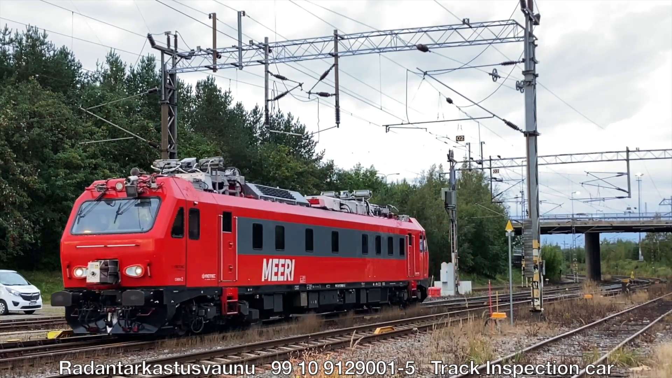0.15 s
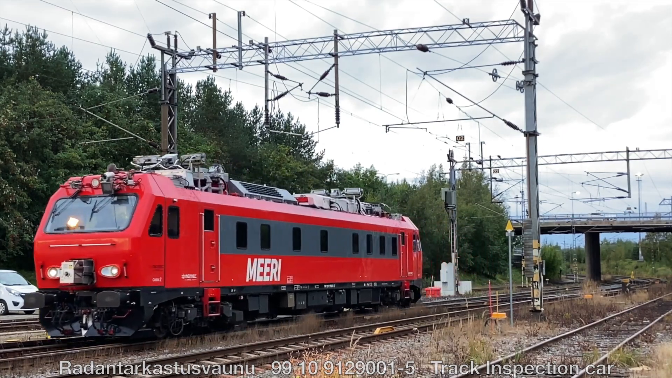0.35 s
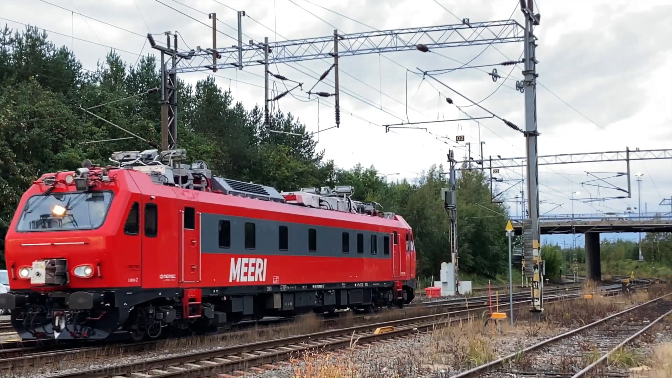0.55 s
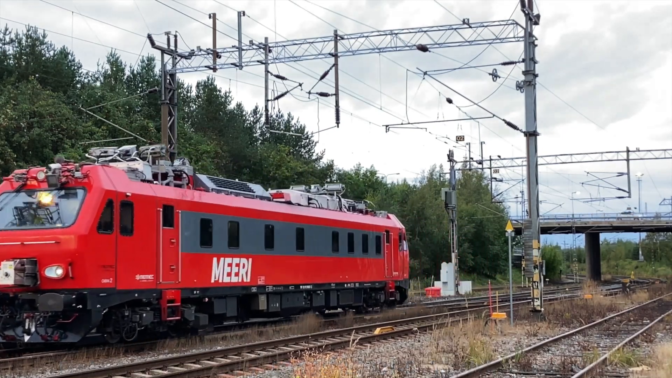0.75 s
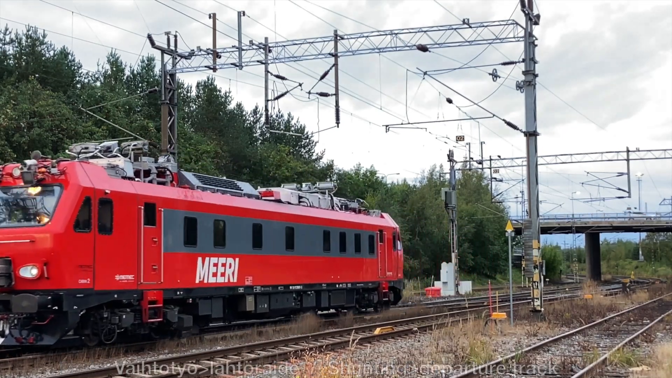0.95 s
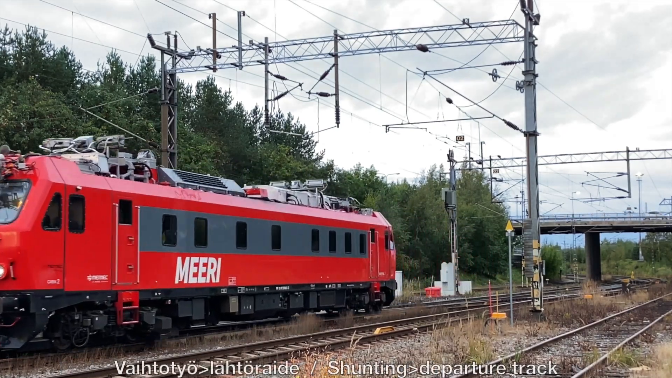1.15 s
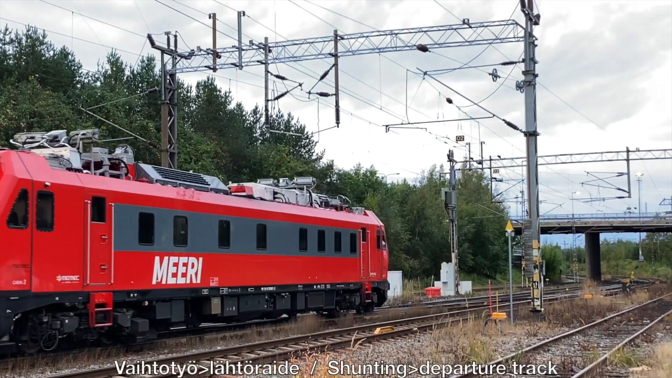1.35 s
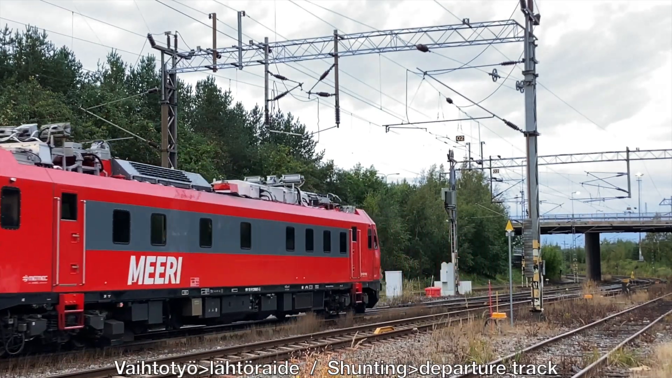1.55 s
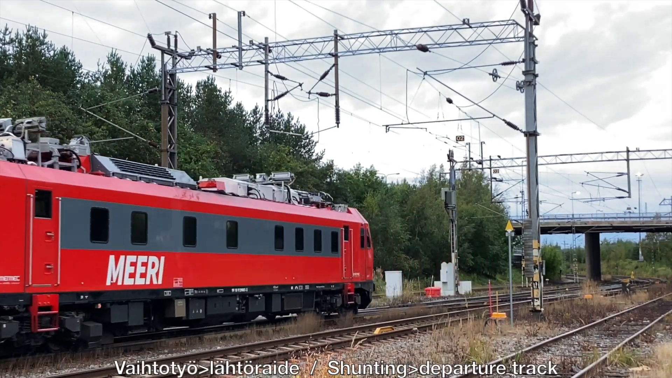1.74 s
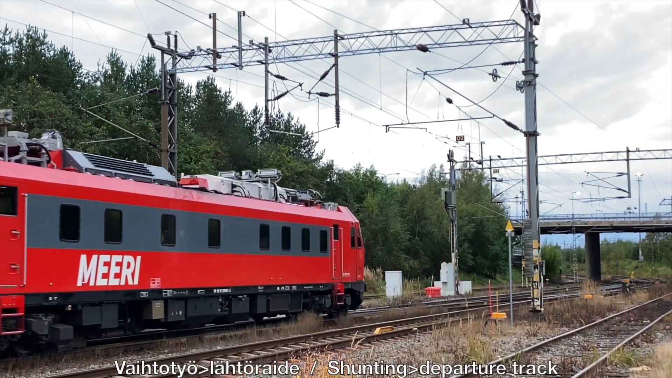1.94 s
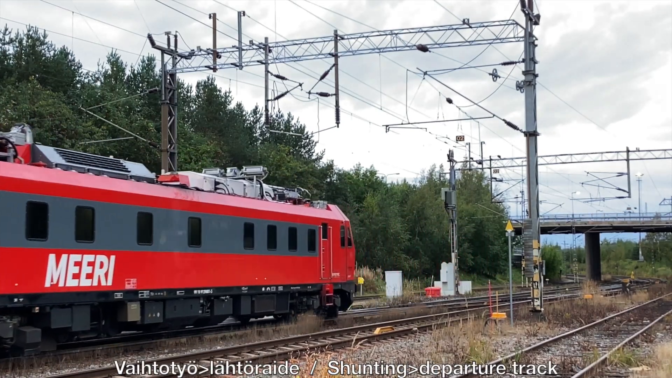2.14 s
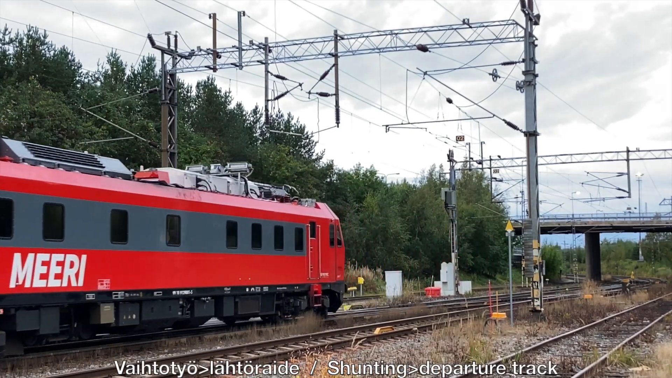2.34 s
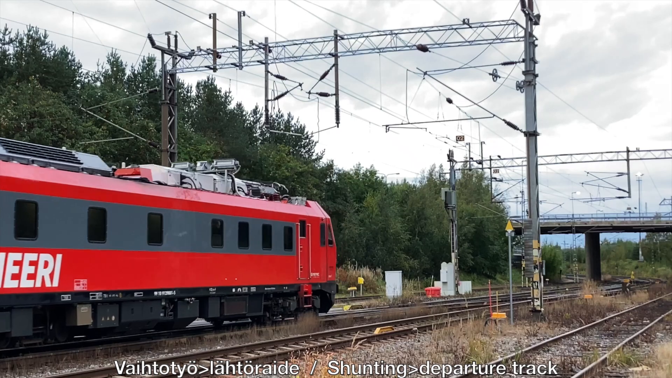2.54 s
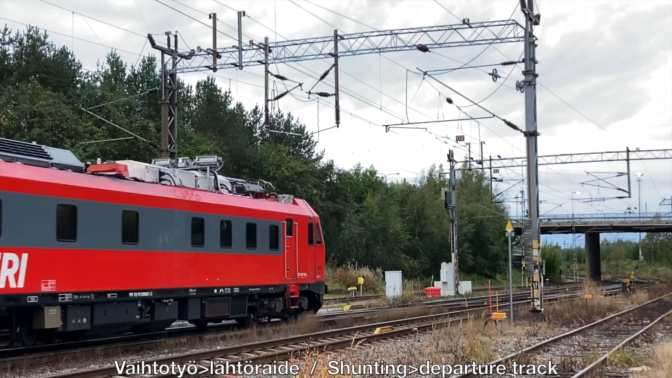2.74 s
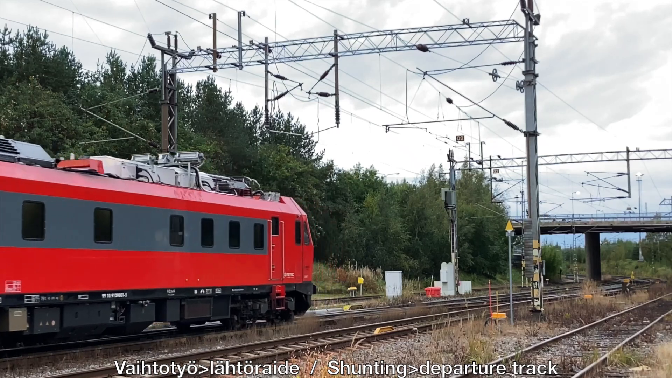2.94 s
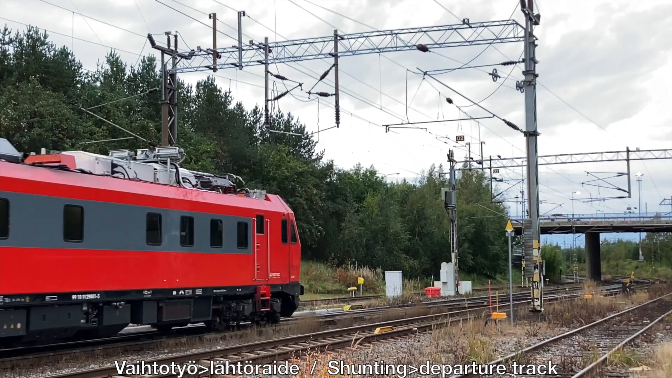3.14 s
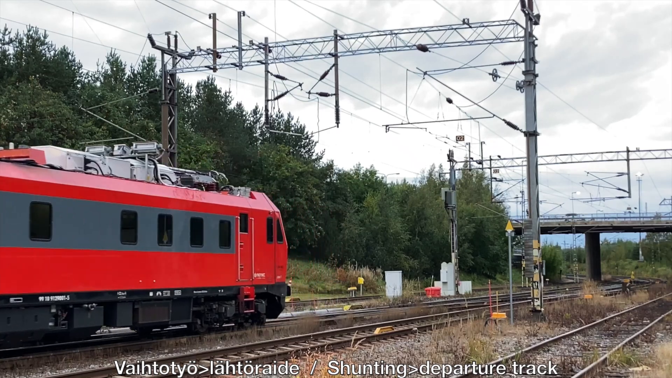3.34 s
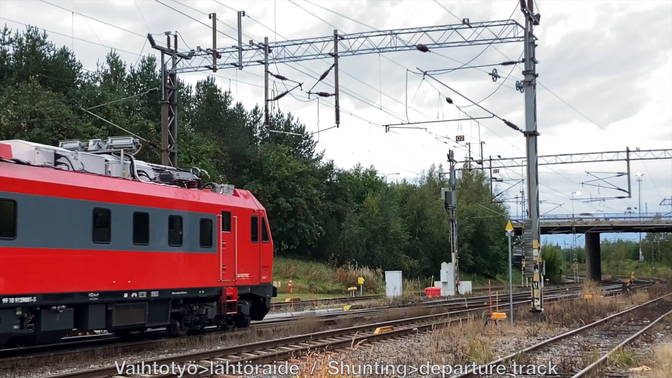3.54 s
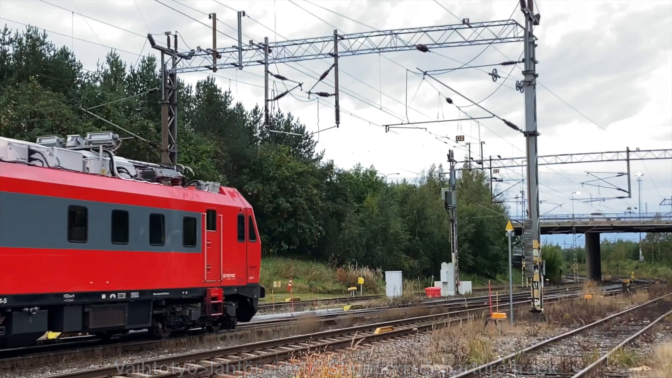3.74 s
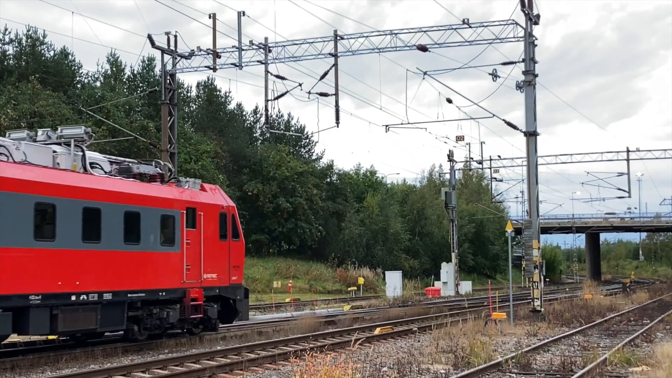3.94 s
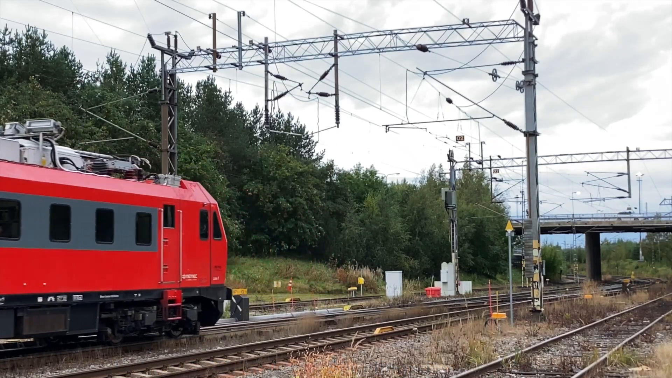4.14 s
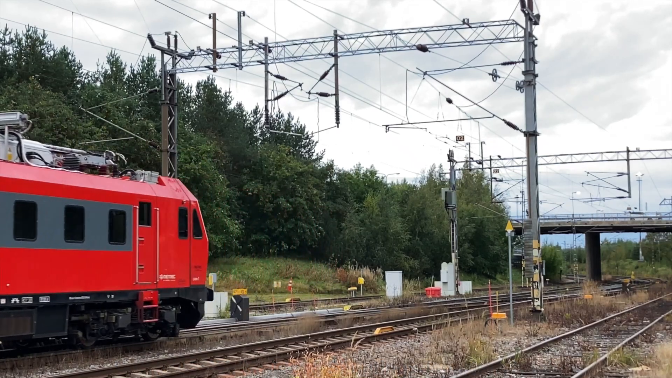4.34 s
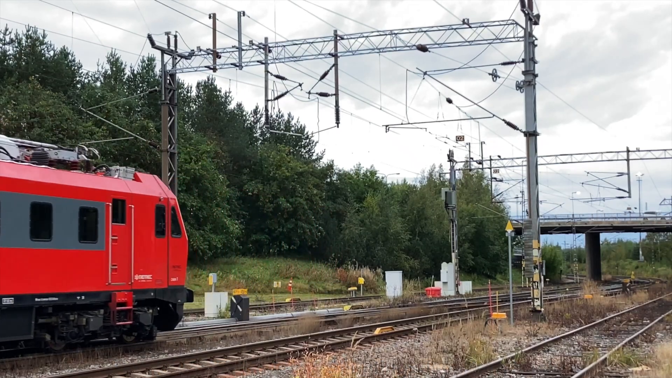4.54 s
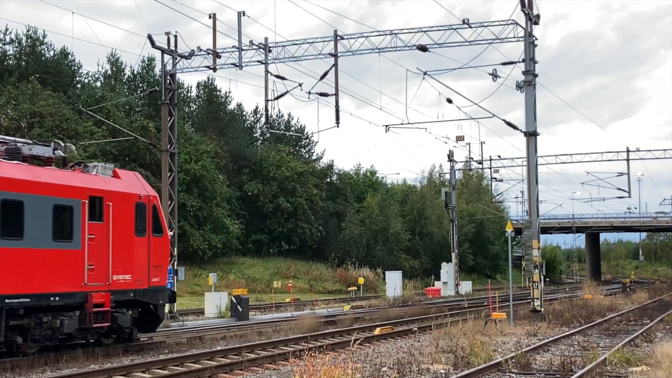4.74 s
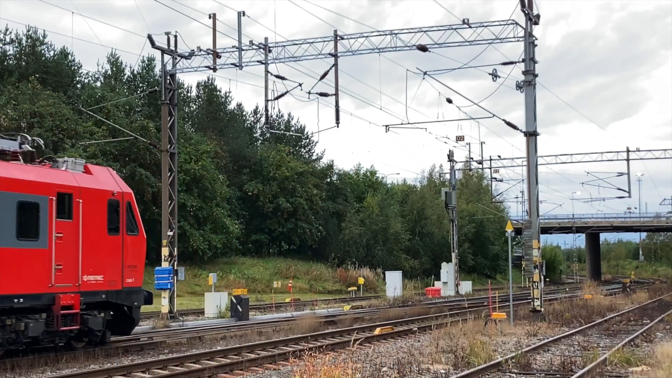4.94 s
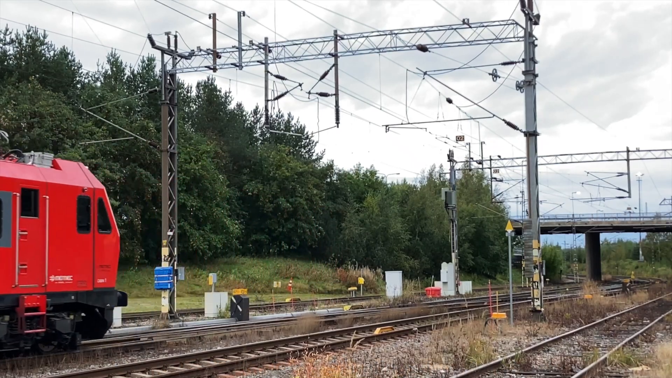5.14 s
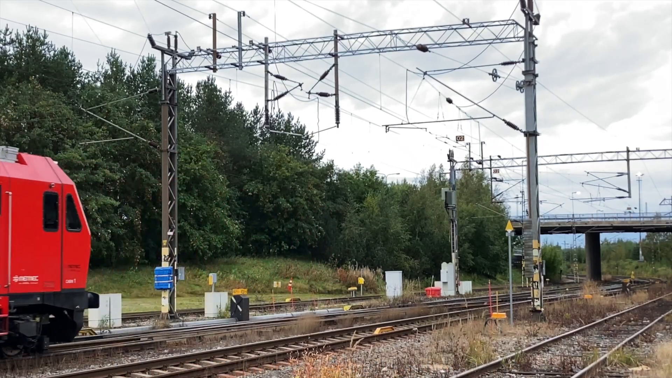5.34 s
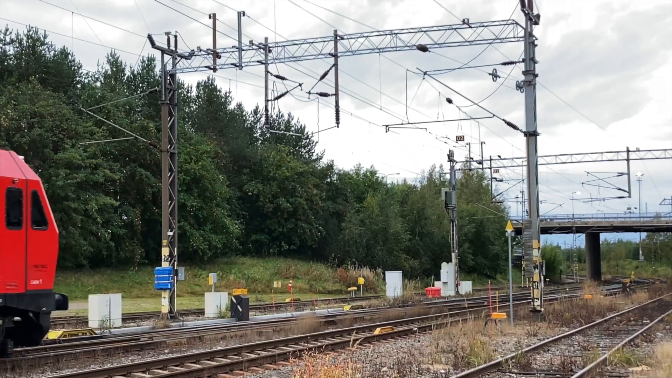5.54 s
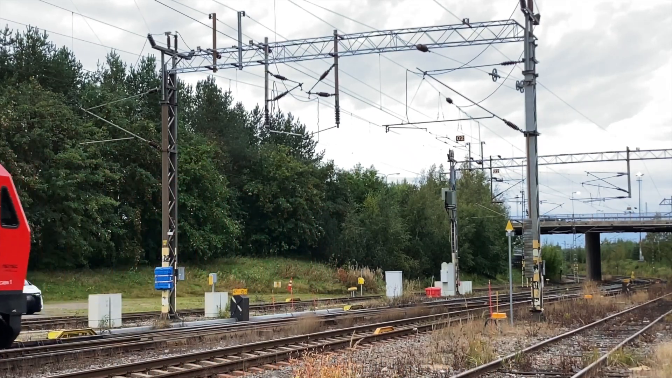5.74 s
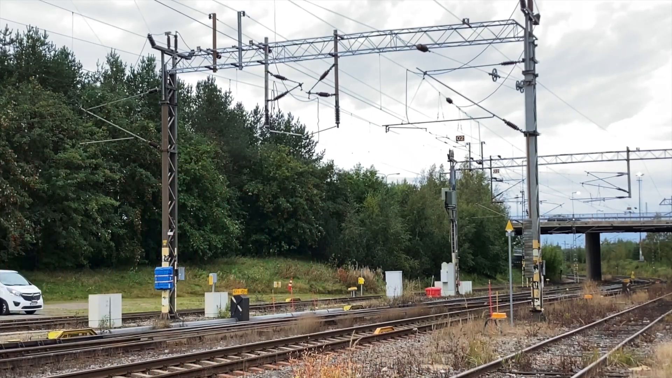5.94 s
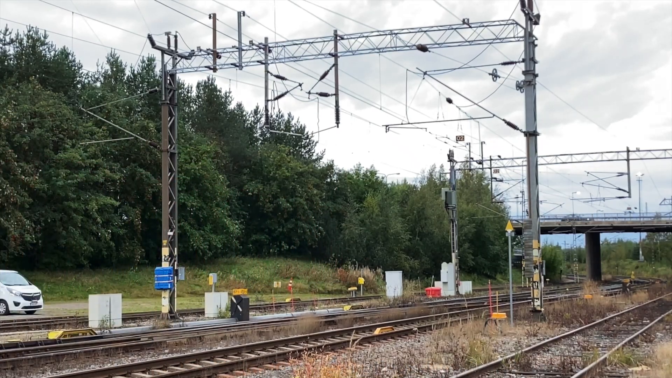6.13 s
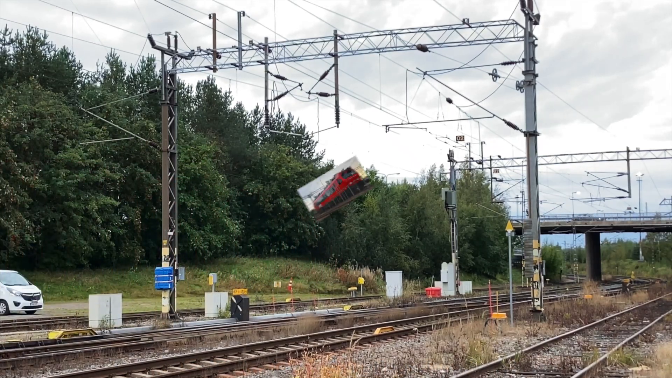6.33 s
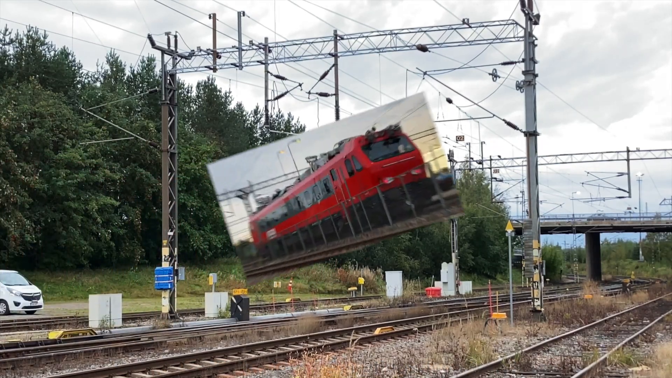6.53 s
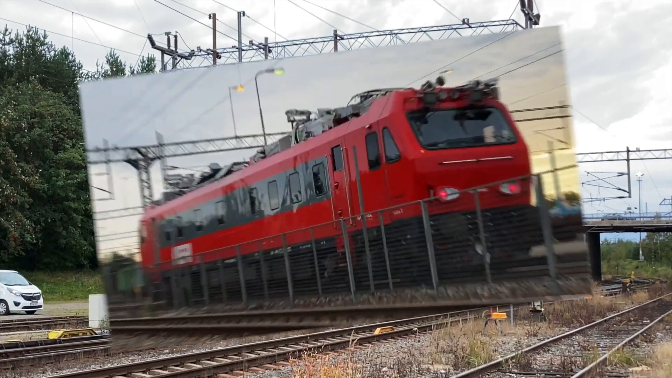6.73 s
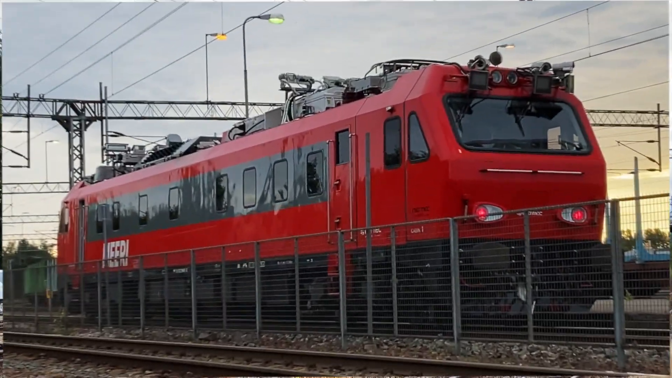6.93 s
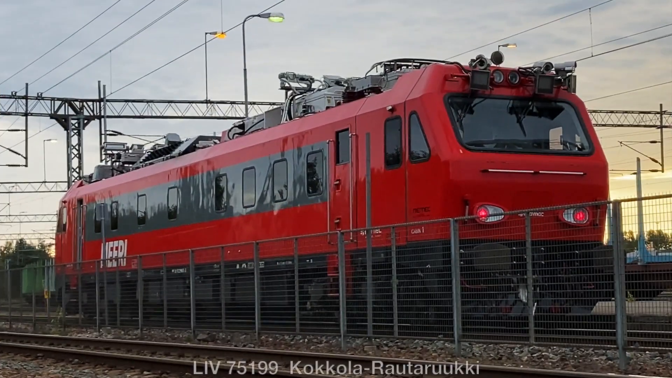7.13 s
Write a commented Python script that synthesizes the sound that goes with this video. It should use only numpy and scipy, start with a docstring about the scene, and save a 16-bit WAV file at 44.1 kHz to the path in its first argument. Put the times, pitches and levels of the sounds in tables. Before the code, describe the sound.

Outdoors in a rail yard, a stereo microphone beside the track catches an electric rail car creeping leftwards. A throbbing wheel squeal, thin whistle, faint converter whine and low rumble run throughout. Paired axle knocks clack and thump over rail joints early, then again midway. Dull sleeper thuds follow as the tail passes. After six seconds it fades while another car's steady roar rises, first on the left.

```python
"""An electric rail car rolls slowly leftwards through a yard past a two-port microphone. From the start a wheel
squeals (a throbbing tone), converters whine (steady lines), a thin whistle sounds and the track rumbles (shaped noise).
Axles knock in pairs over rail joints, with echoes and after-hits: noise bursts, ringing steel and a low thump.
From 3.4 s gear lines come forward, from 3.7 s sleepers thud (fading tones), and near 5.6 s a soft hiss swells.
After 6 s the car fades out while a second car, a steady roar with clean tones, is faded in from the left."""
import sys
import numpy as np
from scipy import signal
from scipy.fft import rfft, irfft
from scipy.io import wavfile
from scipy.ndimage import uniform_filter1d, map_coordinates

SR = 44100
rng = np.random.default_rng(int(sys.argv[2]) if len(sys.argv) > 2 else 0)


def to_wav(s):
    """Save 16-bit WAV."""
    ch = np.atleast_2d(s).T  # columns
    pcm = np.round(np.clip(ch, -1, 1) * 32767)  # PCM
    wavfile.write(sys.argv[1], SR, pcm.astype(np.int16))


N = 316638
T = np.arange(N) / SR  # time of each sample [s]
HZ = np.maximum(np.arange(N // 2 + 1) * SR / N, 1)  # frequency of each spectrum step

# second car: (time [s], level [dB])
SECOND_LEVEL = [(6.1, -62), (6.4, -46), (6.6, -39.5), (6.75, -38.5), (6.95, -36), (7.18, -35.5)]
# colour of its roar: (frequency [Hz], relative level [dB per Hz])
SECOND_COLOUR = [(25, -32), (55, 2), (130, -6), (220, -13.5), (560, -14.5), (900, -13), (1200, -13.5),
                 (1700, -21.5), (2100, -22), (2700, -36.5), (4300, -35.5), (5500, -46), (10600, -46),
                 (16000, -59)]
# its hum and converter lines: (frequency [Hz])
SECOND_LINE_HZ = [376.8, 543.7, 4101, 4263, 4301, 4360, 4402, 6352, 6452, 6652, 6752, 9550, 10654]
# strength of those lines over the car's level: (level [dB])
SECOND_LINE_DB = [-8.5, -13.5, -46, -45, -37, -41, -25, -24, -55, -49, -48, -33, -43]

# dull thuds of the sleepers behind the rear axles: (time [s], level [dB])
THUDS = [(3.719, -19), (3.855, -23.5), (3.909, -35), (3.975, -28.5), (4.194, -25), (4.27, -32),
         (4.331, -24.5), (4.381, -23), (4.457, -33), (4.533, -30.5), (4.587, -30), (4.917, -41),
         (4.958, -27.5), (5.038, -27), (5.13, -29), (5.242, -24), (5.29, -30), (5.506, -33), (5.562, -28.5),
         (5.726, -40), (5.836, -31.5)]
# tones of a struck sleeper: (frequency [Hz], level [dB], time to fall by 60 dB [s])
SLEEPER_MODES = [(146.5, -2.5, 0.079), (209, -1.5, .14), (241, -5.5, 0.083), (326, -9, 0.093)]

# rolling noise: (time [s], track rumble [dB], wheel roar [dB], hiss [dB])
ROLL_LEVEL = [(0, -35.5, -37.5, -44.5), (.55, -30, -38, -43), (.9, -31.5, -35, -38.5),
              (1.15, -34, -36.5, -43), (1.4, -30, -35.5, -37), (1.65, -32.5, -37, -44.5),
              (3.35, -34, -38, -43.5), (3.85, -28, -39, -43.5), (4.35, -30.5, -39, -45),
              (4.7, -35.5, -38, -45.5), (5.16, -30, -41.5, -47.5), (5.5, -39.5, -44, -49),
              (5.76, -33.5, -45, -50.5), (5.98, -41.5, -48, -53), (6.25, -45, -49.5, -56.5),
              (6.5, -49, -53, -58.5)]
# colour of the rolling noise: (frequency [Hz], relative level [dB per Hz])
ROLL_COLOUR = [(25, -25), (50, -2.5), (99, -2.5), (157, -15), (300, -13.5), (560, -17), (1230, -22.5),
               (1450, -15.5), (1700, -18), (2700, -24), (4030, -29.5), (6920, -42.5), (9070, -42.5),
               (11000, -45.5), (16000, -53.5)]
# wheel resonances in the rolling noise: (frequency [Hz], width [Hz], lift [dB])
WHEEL_ROLL = [(2020, 126, 5.5), (3357, 78, 7.5), (4370, 150, 8), (6800, 710, 8), (9620, 120, 18.5),
              (11150, 370, 6), (16600, 180, -3)]
AIR_S, AIR_LENGTH_S, AIR_DB = 5.62, .3, -73  # a soft treble hiss swells as the tail goes by

# motor hum: (time [s], level [dB], time by which the left port leads [ms])
HUM_LEVEL = [(0, -55, -0.069), (.55, -47.5, -0.2), (1.3, -63, 0.29), (2.3, -46.5, 0.23), (3, -46, 0.19),
             (3.35, -50, 0.17), (3.7, -42.5, -0.24), (4.5, -46.5, -0.038), (5.5, -45, -0.4),
             (6.25, -61.5, -0.36), (6.5, -66, -0.3)]
# tones of the motor hum: (frequency at the start [Hz], width [Hz], level [dB])
HUM_TONES = [(566, 30, -0.5), (444.7, 36, -7), (230, 38, -5), (672, 25, -10.5), (1123, 22, -12)]
THUD_DB = -9  # lumpy thudding that comes with the hum, over its level
# gear lines: (frequency at the start [Hz], width [Hz], level [dB])
GEARS = [(1320, 26, 6), (1780, 23, 1), (2020, 20, 0), (2210, 22, -2.5), (2364, 23, 0), (2425, 21, -4.5)]
# the gears come forward once the car has turned its tail: (time [s], level [dB])
GEAR_LEVEL = [(0, -91), (3.4, -67), (4.2, -61.5), (4.8, -58.5), (5.5, -61), (6, -68.5), (6.5, -72)]

COMB_HZ, WHINE_HZ = 101, 4253  # at the start: step between converter lines, lowest line of the lower comb
# upper comb of the converter: (lowest line at the start [Hz], lines [count], level over the hiss [dB])
UPPER_COMB = [(6332, 6, -29)]
FADE_DB, FADE_PER_S = 8, 2.2  # most that an upper line rises or falls, and how often it heads elsewhere
# lower comb, whose lines take turns: (time [s], line 1 [dB], line 2 [dB], line 3 [dB], line 4 [dB])
WHINE_LEVEL = [(0, -69, -65, -79, -70), (.55, -71, -75, -75, -68), (.8, -72, -66, -70, -61),
               (1.05, -72, -56, -65, -63), (1.24, -72, -53, -67, -64), (1.4, -74, -72, -71, -70),
               (1.58, -76, -74, -59, -70), (1.78, -72, -75, -59, -65), (1.9, -71, -74, -68, -70),
               (2.15, -62, -64, -73, -68), (2.5, -79, -59, -76, -65), (2.9, -73, -73, -67, -75),
               (3.6, -76, -74, -77, -72), (3.76, -76, -75, -77, -56), (4.07, -76, -75, -80, -60),
               (4.2, -74, -77, -61.5, -81), (4.8, -83, -73, -69, -83), (5.5, -69, -76, -67, -74),
               (6.2, -89, -85, -81, -92)]

# thin whistle and place of the car: (time [s], whistle [dB], time by which the left port leads [ms])
PASS = [(0, -60, 0.037), (1.5, -64, 0.17), (2.4, -69, 0.2), (3.2, -62, 0.18), (4, -67, 0.22),
        (5, -78, 0.34), (5.8, -84, 0.34), (6.4, -80, 0.41), (6.7, -100, 0.46)]
# pitches falling as the car goes by: (time [s], thin whistle [Hz], squeal [Hz])
PITCH = [(0, 9635, 1448), (1.5, 9585, 1446), (2.7, 9530, 1446), (3.5, 9503, 1441), (4.5, 9475, 1437),
         (5.3, 9455, 1428), (6.4, 9440, 1422)]

# knocks of axles over joints, with their echoes and after-hits:
# (time [s], clack [dB], thump [dB], bright clack [dB])
KNOCKS = [(0.161, -41, -54, -38), (0.24, -35.5, -24, -52), (0.309, -40, -50, -49), (.386, -28.5, -37, -54),
          (.744, -41, -42, -43), (.81, -24.5, -29, -44), (.905, -22, -13.5, -34), (.975, -39, -35, -46),
          (1.237, -24.5, -30, -44), (1.333, -20, -14.5, -28.5), (1.41, -26.5, -41, -35),
          (2.534, -30.5, -27, -48.5), (2.967, -29, -25.5, -45.5), (3.114, -27.5, -38, -50),
          (3.553, -26.5, -39, -45), (3.647, -20, -15, -34.5), (3.716, -39, -60, -49),
          (4.081, -19.5, -16, -33.5), (4.116, -28, -47, -46), (4.35, -54, -50, -65),
          (4.969, -51, -28.5, -78), (5.13, -45, -29, -80), (5.28, -52, -28.5, -85), (5.549, -53, -33, -86)]
# colour of the clacks: (frequency [Hz], relative level [dB per Hz])
CLACK_COLOUR = [(200, 3.5), (450, -2), (750, -4), (1400, -4), (2500, -17.5), (3300, -22.5), (3700, -8.5),
                (5000, -12), (7000, -12), (8500, -15), (11000, -15.5), (13500, -17), (16000, -39)]
# wheel resonances in the clacks: (frequency [Hz], width [Hz], lift [dB])
WHEEL_CLACK = [(2026, 460, 11.9), (2280, 50, 1.3), (3500, 370, 10.5), (4970, 590, 6.8), (6080, 720, 4.8),
               (8600, 200, 3), (10640, 550, 6.3), (15400, 440, 19)]
# rail, sleepers and wheel after a knock: (frequency [Hz], level [dB], time to fall by 60 dB [s])
TRACK_MODES = [(70.4, 5.5, 0.13), (100.3, -4, 0.17), (125.7, -5.5, 0.32), (231, -7, 0.077),
               (314.3, -3.5, 0.12), (361.6, -16, 0.28), (551.4, -12.5, 0.12), (716, -11, 0.079)]
# wheel and rail steel when struck: (frequency [Hz], level [dB], time to fall by 60 dB [s])
STEEL_MODES = [(443, -12, 0.047), (649, -0.5, 0.09), (796, -4, 0.12), (1078, -1, 0.067), (1387, -2, 0.096),
               (1810, -6.5, 0.1), (2004, -8, 0.081), (2510, -11, 0.089), (2840, -9, 0.053),
               (3280, 0, 0.068), (3570, 4.5, 0.077), (4510, -7, 0.096), (4910, -3, 0.1), (6540, -6, 0.086)]
RATTLE_DB, RATTLE_S = -18, 0.099  # rattle over the thump, and its length
KNOCK_DB = 3.55  # drive of the higher track modes over the mean of clack and thump
THUMP_LATE_S = .0015  # the track answers just after the clack
STEEL_DB = -6  # steel ring over the clack
BOUNCES, BOUNCE_S, BOUNCE_DB = 10, .11, -10  # loose parts strike again within this time, weaker

# wheel squeal: (time [s], level [dB], time by which the left port leads [ms], waver of that lead [ms])
SQUEAL = [(0, -35.5, .04, 0.055), (.08, -39, .04, .05), (.15, -34.5, 0.046, 0.067),
          (.56, -29, 0.087, 0.054), (.7, -40.5, 0.025, 0.15), (.85, -32, 0.11, 0.068),
          (1.0, -30, 0.11, .07), (1.05, -36, 0.067, .07), (1.22, -30.5, 0.16, 0.063),
          (1.4, -37.5, 0.15, 0.088), (1.7, -34, 0.14, 0.17), (1.82, -31, 0.16, 0.073),
          (2.1, -30, 0.21, 0.048), (2.3, -31, 0.17, .07), (2.5, -28, 0.2, 0.093),
          (2.66, -32.5, 0.11, 0.076), (2.8, -31.5, 0.34, 0.13), (2.9, -39.5, 0.22, 0.075),
          (3.2, -35, 0.26, 0.21), (3.45, -41.5, 0.13, 0.15), (3.7, -37, 0.3, .07),
          (4.1, -38.5, 0.21, 0.018), (4.45, -39, 0.27, 0.022), (4.9, -34.5, 0.28, 0.057),
          (5.1, -40, 0.26, .02), (5.4, -35.5, 0.32, 0.041), (5.7, -40.5, .31, 0.027),
          (5.85, -50, 0.42, 0.025), (6.5, -47.5, 0.44, 0.018), (6.75, -60, 0.42, .02)]
THROB, THROB_PER_S, THROB_SPREAD = .36, 14., 4.  # depth, beats a second, their wander
SCATTER_DB = -19  # reflected squeal over the direct squeal

# share of power that both ports hear alike: (frequency [Hz], share [0 to 1])
DIRECT = [(60, 0.84), (400, 0.93), (1000, 0.95), (2500, 0.29), (5000, 0.036), (16000, 0.082)]
# the ports differ in colour: (frequency [Hz], left minus right [dB])
LEFT_LOUDER = [(100, 0.5), (300, 1), (700, 2), (2000, 0.54)]
# in the treble the image flips between centred and out of phase: (frequency [Hz], side over mid [dB])
IMAGE = [(6200, 0), (7200, -5.5), (8000, -18), (8700, 23), (9300, 32), (10200, -12), (11000, -26),
         (11900, -46), (12600, 3), (13200, 28), (14200, 20), (14700, -2), (15200, -31), (16000, -44)]
TOP_HZ = 15750  # nearly everything above is cut


def undb(db):
    """Turn decibels into a gain."""
    return 10 ** (np.asarray(db) / 20)


def unit(x):
    """Scale to an average (rms) strength of 1."""
    return x / np.sqrt(np.mean(x ** 2))


def curves(table):
    """Draw each column of a time table as a line with one value a sample."""
    s, *columns = np.transpose(table)
    return [np.interp(T, s, column) for column in columns]


def over_hz(table, hz):
    """Read a spectrum table, with frequency spaced by ratio as the ear hears it."""
    f, value = np.transpose(table)
    return np.interp(np.log(hz), np.log(f), value)


def walk(rate):
    """Wander at random: levels held for 1 / rate seconds and smoothed twice, with a spread near 1."""
    k = int(SR / rate)
    held = np.repeat(rng.standard_normal(N // k + 1), k)
    return 1.3 * uniform_filter1d(uniform_filter1d(held, k), k)[:N]


def ports(x, lead_ms, order=1):
    """Delay the right port, because sound from the left reaches the left port first."""
    late = map_coordinates(x, [np.arange(N) - lead_ms * SR / 1000], order=order, mode="nearest")
    return np.array([x, late])


def noise(colour, lead_ms):
    """Spectra of coloured noise at both ports: a direct part they share and a scattered part they do not."""
    share = np.clip(over_hz(DIRECT, HZ), 0, 1)
    direct = ports(rng.standard_normal(N), lead_ms, order=3)
    scattered = rng.standard_normal((2, N))
    mixed = np.sqrt(share) * rfft(direct) + np.sqrt(1 - share) * rfft(scattered)
    return mixed * undb(over_hz(colour, HZ))


def lift(modes):
    """Gain of resonances, each a bump along the spectrum."""
    return undb(sum(db / (1 + (2 * (HZ - hz) / width) ** 2) for hz, width, db in modes))


def flicker(spectrum, lo_hz, hi_hz, flicker_db, rate):
    """Cut noise into slices up to about an octave wide, each wavering in level on its own."""
    edges = np.geomspace(lo_hz, hi_hz, int(np.log2(hi_hz / lo_hz)) + 2)
    total = 0
    for low, high in zip(edges, edges[1:]):
        part = irfft(spectrum * ((HZ >= low) & (HZ < high)), N)
        total = total + part * undb(flicker_db * walk(rate))
    return unit(total)


def tone(hz, width, steady=0.):
    """A tone on a moving pitch; random strength and phase spread it over the given width."""
    turn = 2 * np.pi * np.cumsum(hz) / SR
    return unit((steady + walk(width)) * np.cos(turn) + walk(width) * np.sin(turn))


def second_car():
    """A steady roar of coloured noise and clean converter lines, heard first on the left."""
    lead_ms = np.full(N, .38)
    roar = irfft(noise(SECOND_COLOUR, lead_ms), N) * undb(0.29 * walk(9.5))
    lines = 0
    for hz, db in zip(SECOND_LINE_HZ, SECOND_LINE_DB):
        strength = undb(db + 2.1 * walk(17.0))
        lines = lines + strength * np.sin(2 * np.pi * hz * T + .6 * walk(13.0))
    lines_in = np.clip((T - 6.3) / 0.11, 0, 1)
    level = undb(curves(SECOND_LEVEL)[0]) * (T > 6)
    return level * (unit(roar) + ports(lines * lines_in, lead_ms, order=3))


def thuds():
    """Soft blows ring the sleeper modes, each time in another mix of phases."""
    t, out = T[:SR // 4], np.zeros(N)
    s, level_db = np.transpose(THUDS)
    phases = 2 * np.pi * rng.random((len(s), len(SLEEPER_MODES)))
    for i, db, start in zip((s * SR).astype(int), level_db, phases):
        ring = 0
        for (hz, mode_db, t60), phase in zip(SLEEPER_MODES, start):
            ring = ring + undb(mode_db - 60 * t / t60) * np.sin(2 * np.pi * hz * t + phase)
        soft_start = 1 - np.exp(-t / 0.0057)
        out[i:i + len(t)] += undb(db) * soft_start * ring
    return out


def rolling_noise(lead_ms):
    """Rough wheels on rough rail make rumble, roar and hiss; lumpy thudding and a late soft hiss join in."""
    rumble_db, roar_db, hiss_db = curves(ROLL_LEVEL)
    spectrum = noise(ROLL_COLOUR, lead_ms) * lift(WHEEL_ROLL)
    rumble = undb(rumble_db) * flicker(spectrum, 24, 160, flicker_db=2.5, rate=16.)
    roar = undb(roar_db) * flicker(spectrum, 160, 1500, flicker_db=0.9, rate=17.0)
    hiss = undb(hiss_db) * flicker(spectrum, 1412, 17000, flicker_db=1.5, rate=15.0)
    swell = np.exp(-((T - AIR_S) / AIR_LENGTH_S) ** 4)
    air = undb(AIR_DB) * swell * flicker(spectrum, 4800, 6600, flicker_db=0.0, rate=20.)
    hum_db = curves(HUM_LEVEL)[0]
    thud = undb(hum_db + THUD_DB) * flicker(spectrum, 140, 275, flicker_db=9.0, rate=20.0)
    return rumble + roar + hiss + air + thud


def motor_and_gears(doppler):
    """Motor tones with a steady core and wandering gear tones; their pitches fall as the car goes by."""
    hum_db, hum_lead_ms = curves(HUM_LEVEL)
    hum = undb(hum_db) * sum(undb(db) * tone(hz * doppler, width, steady=.9) for hz, width, db in HUM_TONES)
    gears = sum(undb(db) * tone(hz * doppler, width) for hz, width, db in GEARS)
    gears = undb(curves(GEAR_LEVEL)[0]) * gears
    return ports(hum + gears, hum_lead_ms)


def converter_whine(doppler, lead_ms):
    """Converters sing in two combs of evenly spaced lines, each line wandering in strength and phase."""
    turn = 2 * np.pi * np.cumsum(doppler) / SR
    upper = 0
    for hz, count, db in UPPER_COMB:
        for k in range(count):
            strength = undb(db + FADE_DB * np.tanh(walk(FADE_PER_S)))
            upper = upper + strength * np.sin((hz + k * COMB_HZ) * turn + 2 * walk(FADE_PER_S))
    lower = 0
    for k, db in enumerate(curves(WHINE_LEVEL)):
        strength = np.sqrt(2) * undb(db + 2.3 * walk(14.))
        lower = lower + strength * np.sin((WHINE_HZ + k * COMB_HZ) * turn + 1.13 * walk(16.))
    hiss_db = curves(ROLL_LEVEL)[2]
    # the lower comb wanders around the middle
    return ports(undb(hiss_db) * upper, lead_ms, order=3) + ports(lower, 0.022 * walk(3.), order=3)


def rolling(doppler, lead_ms):
    """All that sounds steadily as the car rolls, fading away by 6.75 s."""
    gone = np.clip((6.75 - T) / .4, 0, 1)
    return gone * (rolling_noise(lead_ms) + motor_and_gears(doppler) + converter_whine(doppler, lead_ms))


def thin_whistle(hz):
    """A thin high tone, partly steady and partly wandering, moves left with the car."""
    level_db, lead_ms = curves(PASS)
    return undb(level_db) * ports(tone(hz, 22.6, steady=0.39), lead_ms, order=3)


def steel_ring():
    """Every blow and its bounces ring the steel modes, each time in another mix."""
    t, out = T[:SR // 4], np.zeros(N)
    s, clack_db, _, bright_db = np.transpose(KNOCKS)
    # column 0 is the blow itself, the others are its bounces; 1 means late by the whole bounce time
    late = rng.random((len(s), BOUNCES + 1)) * (np.arange(BOUNCES + 1) > 0)
    at = ((s[:, None] + 0.0033 + BOUNCE_S * late) * SR).astype(int).ravel()
    mix = rng.standard_normal((len(at), len(STEEL_MODES)))
    for k, (hz, db, t60) in enumerate(STEEL_MODES):
        hits = np.zeros(N)
        blow_db = (clack_db if hz < 2600 else bright_db)[:, None]
        size_db = blow_db + (late > 0) * BOUNCE_DB - 6.5 * late
        hits[at] = undb(size_db).ravel() * mix[:, k]
        ring = undb(db - 60 * t / t60) * np.sin(2 * np.pi * hz * t)
        out = out + signal.oaconvolve(hits, ring)[:N]
    return undb(STEEL_DB) * out


def track_thump(boom, knock):
    """The blow spreads along the track, its lows arriving last: a falling swing, then ringing track modes."""
    t = T[:SR // 2]
    swing = np.sin(2 * np.pi * np.cumsum(85 + 110 * np.exp(-t / 0.014)) / SR)
    swing = swing * (1 - np.exp(-(t / 0.0048) ** 2)) * np.exp(-t / 0.012)
    thump = undb(5.5) * signal.oaconvolve(boom, swing)[:N]
    for k, (hz, db, t60) in enumerate(TRACK_MODES):
        swing_up = 1 - np.exp(-(t * hz / 0.74) ** 2)  # slower for a lower mode
        ring = undb(db - 60 * t / t60) * np.sin(2 * np.pi * hz * t + np.pi * k) * swing_up
        thump = thump + signal.oaconvolve(boom if hz < 160 else knock, ring)[:N]
    return thump


def knocks(lead_ms):
    """Each knock or after-hit gives a clack, a loose rattle after it and a ring of the steel and the track."""
    clack, treble, boom, knock = np.zeros((4, N))
    t = T[:SR // 2]
    for s, clack_db, thump_db, bright_db in KNOCKS:
        i = int(s * SR)
        # the rattle holds for a while, then the parts settle; the small bright ones settle last
        rattle = undb(thump_db + RATTLE_DB - clack_db)
        dull_rattle = rattle / (1 + np.exp((t - RATTLE_S) / .015))
        bright_rattle = rattle / (1 + np.exp((t - RATTLE_S) / .03))
        onset = undb(clack_db) * (1 - np.exp(-t / 0.0038))
        bright = undb(bright_db - clack_db)
        clack[i:i + len(t)] += onset * (np.exp(-t / .016) + dull_rattle)
        treble[i:i + len(t)] += onset * (np.exp(-t / 0.014) + 1.53 * bright_rattle) * bright
        j = i + int(THUMP_LATE_S * SR)
        boom[j] = undb(thump_db)
        knock[j] = undb((clack_db + thump_db) / 2 + KNOCK_DB)
    steel = noise(CLACK_COLOUR, lead_ms / 1.77) * lift(WHEEL_CLACK)
    # loose parts strike out of step, so each range of the rattle comes in clumps
    low = flicker(steel, 150, 3300, flicker_db=3., rate=90.)
    high = flicker(steel, 2600, 17000, flicker_db=1.5, rate=120.)
    return clack * low + treble * high + ports(steel_ring() - track_thump(boom, knock), lead_ms)


def squeal(hz):
    """Stick-slip holds one wheel mode: a throbbing line in a rough halo; reflections differ at each port."""
    level_db, lead_ms, waver_ms = curves(SQUEAL)
    line = np.sin(2 * np.pi * np.cumsum(hz + 4. * walk(30.)) / SR)
    halo = undb(-18) * tone(hz, 80.)
    beat_depth = 1 + .4 * walk(6.)
    beat = beat_depth * np.cos(2 * np.pi * np.cumsum(THROB_PER_S + THROB_SPREAD * walk(8.)) / SR)
    direct = ports(unit((1 + THROB * beat) * line + halo), lead_ms + waver_ms * np.tanh(walk(22.)))
    scattered = undb(SCATTER_DB) * np.array([tone(hz, 14.0), tone(hz, 21.0)])
    return undb(level_db) * (T < 6.8) * (direct + scattered)


def scene():
    """Add up both cars at the two ports."""
    whistle_hz, squeal_hz = curves(PITCH)
    lead_ms = curves(PASS)[1]
    doppler = whistle_hz / whistle_hz[0]  # pitch as a share of the pitch at the start
    background = second_car() + ports(thuds(), lead_ms) + rolling(doppler, lead_ms)
    return background + thin_whistle(whistle_hz) + knocks(lead_ms) + squeal(squeal_hz)


def record(dry):
    """The ports differ in colour, treble power tips between mid and side, and the top is cut."""
    left, right = rfft(dry) * undb(over_hz(LEFT_LOUDER, HZ) * np.array([[.5], [-.5]]))
    tip = undb(over_hz(IMAGE, HZ)) ** 2  # side power over mid power
    mid = (left + right) * np.sqrt(2 / (1 + tip)) / 2
    side = (left - right) * np.sqrt(2 * tip / (1 + tip)) / 2
    out = irfft(np.array([mid + side, mid - side]), N)
    return signal.sosfilt(signal.ellip(14, .2, 80, TOP_HZ, fs=SR, output="sos"), out)


dry = scene()
out = record(dry)
to_wav(out)
```